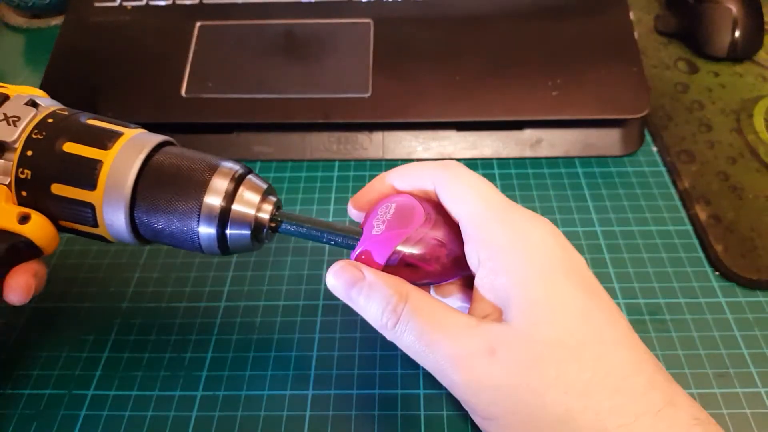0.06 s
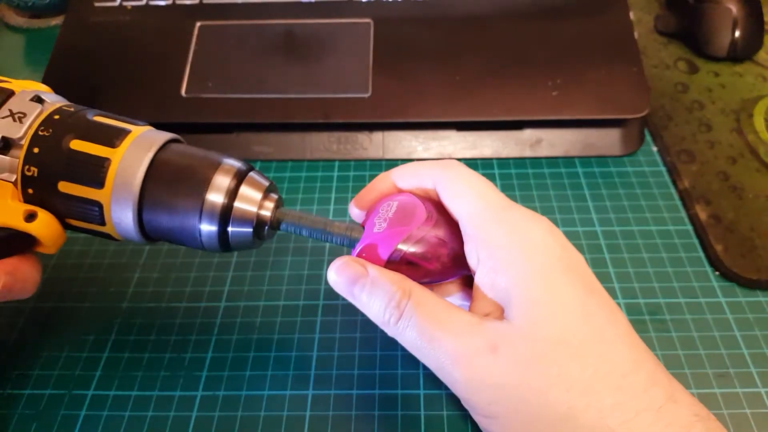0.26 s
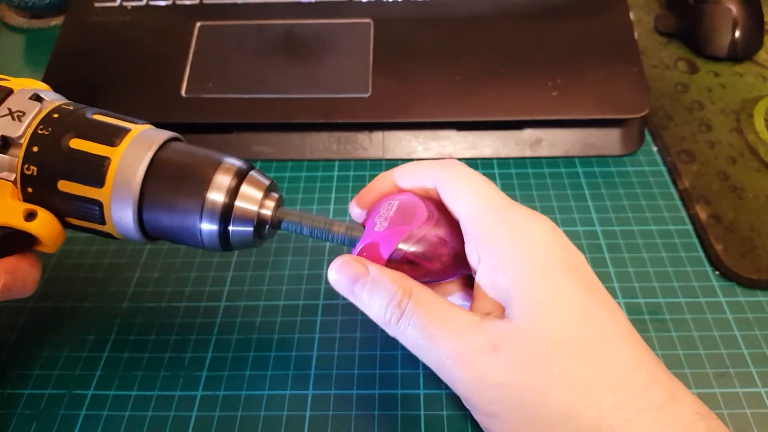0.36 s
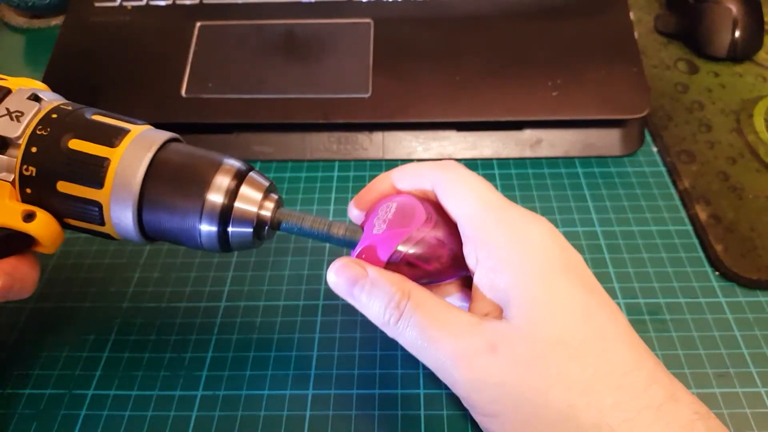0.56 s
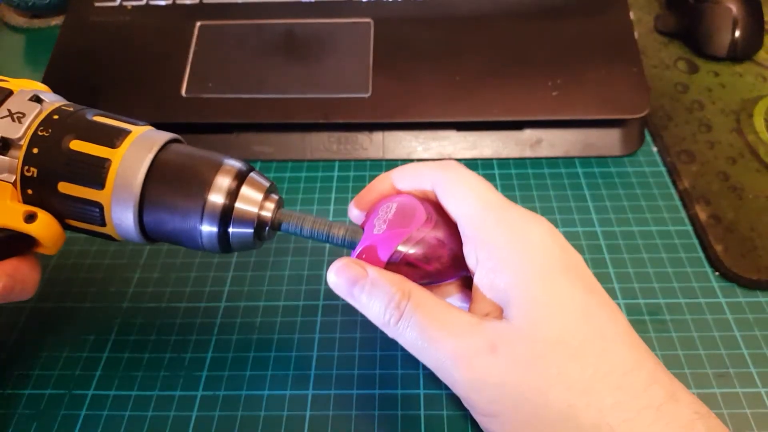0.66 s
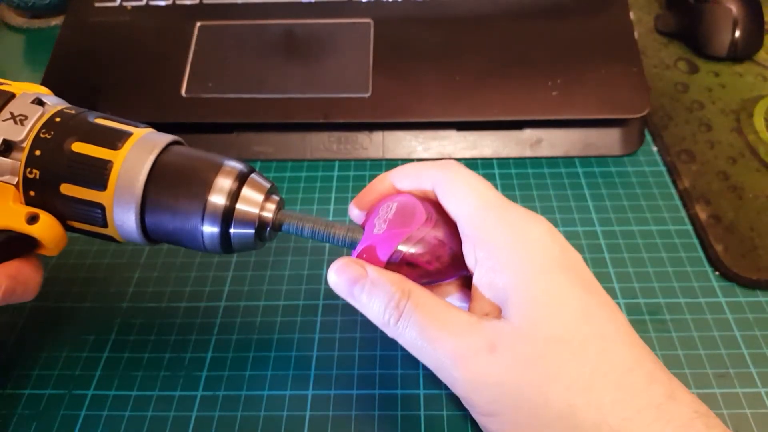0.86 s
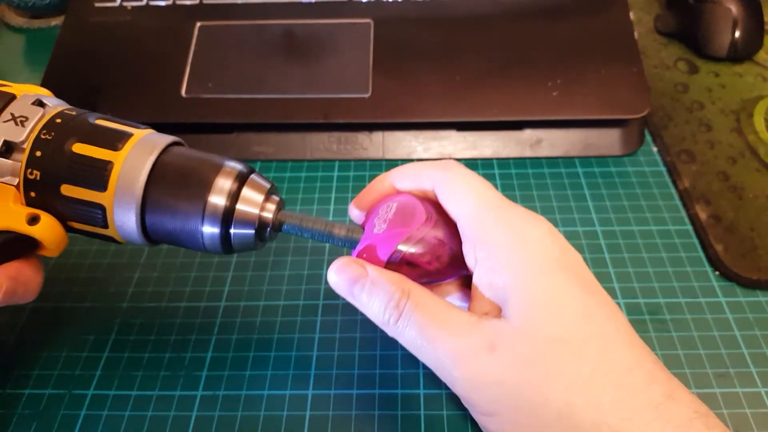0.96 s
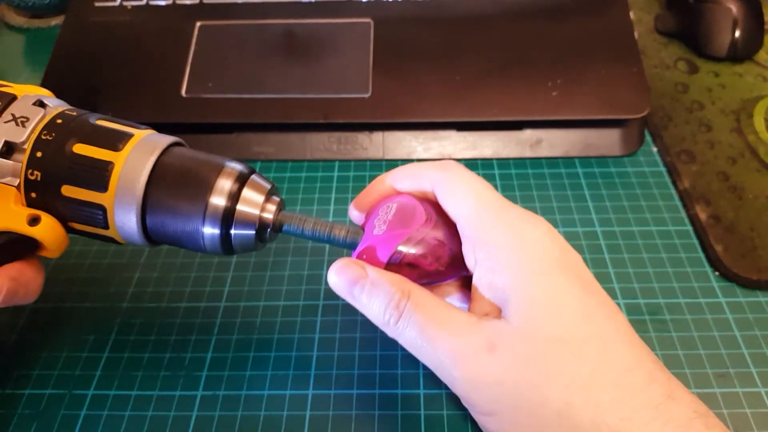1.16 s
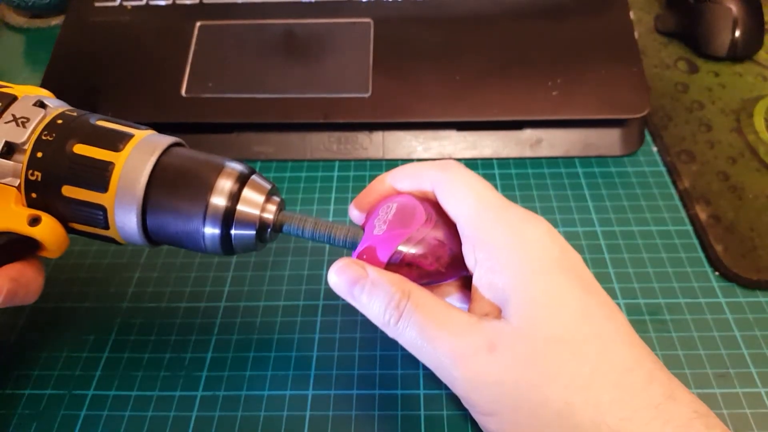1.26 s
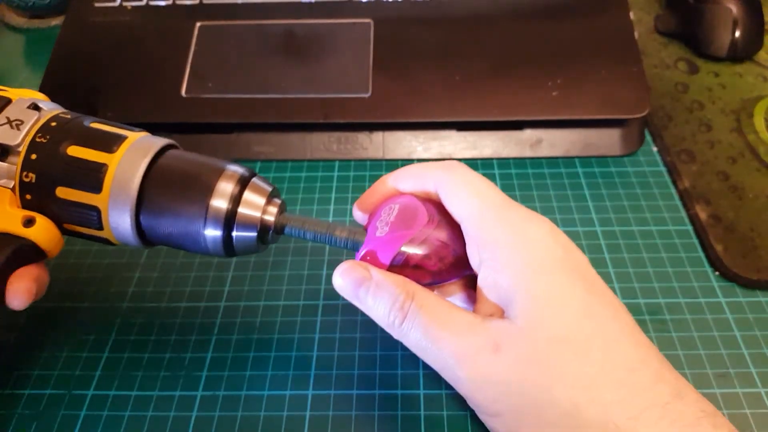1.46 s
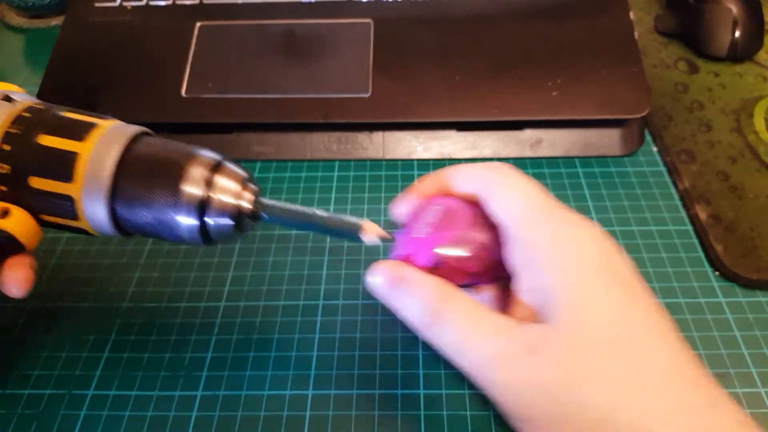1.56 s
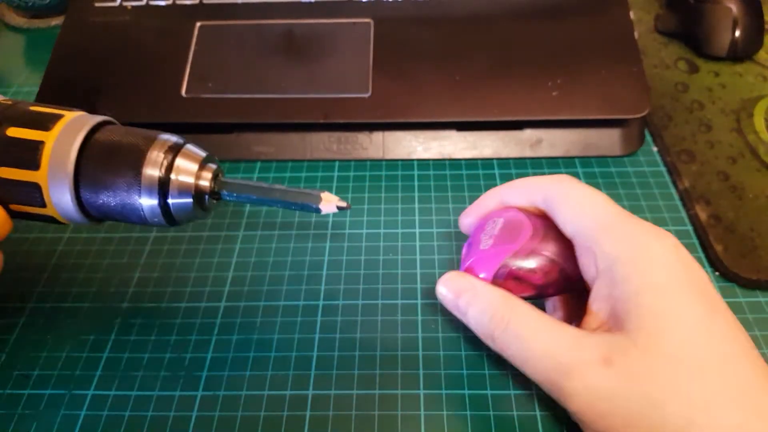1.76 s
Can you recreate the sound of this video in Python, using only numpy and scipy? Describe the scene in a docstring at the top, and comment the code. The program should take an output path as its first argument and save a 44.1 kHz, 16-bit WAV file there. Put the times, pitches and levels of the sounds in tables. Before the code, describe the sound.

Close up at a desk in a quiet room, a cordless drill starts with small clicks and runs once, gears whining and rattling as a sharpener rasps a spinning pencil. The brake clacks, followed by faint handling bumps.

```python
"""A small room, a stereo microphone close to a desk: a cordless drill spins a pencil in a hand-held
plastic sharpener. Over faint room tone the trigger clicks, the gear slack rattles and the motor runs
up to 392 turns a second. While it holds that speed, motor and planet gears whine and rattle, the blade
hisses on the wood and the pencil scuffs once a turn. At about a second and a half the brake stops it
with a clack, and the hands let go of the torque with a few dull thuds."""
import sys
import numpy as np
from scipy import signal
from scipy.fft import rfft, irfft
from scipy.io import wavfile
from scipy.ndimage import uniform_filter1d

SR = 44100
rng = np.random.default_rng(int(sys.argv[2]) if len(sys.argv) > 2 else 0)


def unload_wav(signal):
    """Save mono or channel-first audio to the path in sys.argv[1] as 16-bit WAV at rate SR, clipped to [-1, 1]."""
    wavfile.write(
        sys.argv[1],
        SR,
        np.round(np.clip(np.atleast_2d(signal).T, -1, 1) * 32767).astype(np.int16),
    )


N = 79380
T = np.arange(N) / SR
HZ = np.fft.rfftfreq(N, 1 / SR)
MOTOR_HZ, START_S, BRAKE_S = 392.5, .225, 1.4577
CARRIER_RATIO, CHUCK_RATIO = 4.045, 12.135  # motor turns to one turn of the planet carrier, of the chuck


def amp(db):
    """Decibels to gain."""
    return 10 ** (np.asarray(db) / 20)


def unit(x):
    """Scales to rms 1."""
    return x / np.sqrt(np.mean(x ** 2) + 1e-20)


def read(points, hz, column=1):
    """Reads a column of a table on a log-frequency axis."""
    table = np.transpose(sorted(map(tuple, points)))
    return np.interp(np.log(hz + 1), np.log(table[0] + 1), table[column])


def drift(rate_hz):
    """A smooth random wander of rms 1, up to about the given rate."""
    return unit(irfft(rfft(rng.standard_normal(N)) / (1 + (HZ / rate_hz) ** 4), N))


def blow(start, rise, decay):
    """The envelope of an impact: a straight rise and an exponential decay."""
    age = np.maximum(T - start, 0)
    return np.minimum(age / rise, 1) * np.exp(-np.maximum(age - rise, 0) / decay)


# How alike the microphone's two sides are. Each row: frequency in Hz, correlation from 0 to 1.
STEREO_LIKENESS = [(100, 1), (400, 1), (800, 0.38), (1400, 0), (4000, 0), (16000, 0)]

def colour(pair, spectrum):
    """Gives two white signals a smooth spectrum (one level column, or left and right) and shared bass."""
    left, other = rfft(pair)
    same = read(STEREO_LIKENESS, HZ)
    right = same * left + np.sqrt(1 - same ** 2) * other
    gain = amp([read(spectrum, HZ), read(spectrum, HZ, column=-1)])
    gain = uniform_filter1d(uniform_filter1d(gain, size=61), size=61)
    return irfft(gain * np.array([left, right]), N) * np.sqrt(SR / 2)


# The quiet room at the microphone. Each row: frequency in Hz, level in dB per Hz.
ROOM_TONE = [(20, -89), (60, -90.5), (125, -87), (200, -96.5), (350, -92.5), (600, -103), (1300, -103),
             (2500, -110), (7000, -112), (10000, -117), (12700, -112), (16000, -118)]

def room_tone():
    """A faint, steady noise, strongest in the bass."""
    return colour(rng.standard_normal((2, N)), ROOM_TONE)


# The small room's decay. Each row: frequency in Hz, seconds to fall by 60 dB.
ROOM_DECAY = [(150, 0.9), (1000, 0.21), (3000, 0.33), (7000, .42), (12000, .5)]

def reflections(x, tail_db=-23, early_db=-13.5, early_s=0.015):
    """Quick reflections from the desk and a faint tail from the room."""
    length = SR // 2
    hz, t, bands = signal.stft(rng.standard_normal((2, length)), SR, nperseg=256)
    decay = amp(-60 * t / read(ROOM_DECAY, hz)[:, None])
    tail = signal.istft(bands * decay, SR, nperseg=256)[1][:, :length]
    early = rng.standard_normal((2, length)) * np.exp(-T[:length] / early_s)
    echo = amp(tail_db) * tail / np.linalg.norm(tail[0])
    echo += amp(early_db) * early / np.linalg.norm(early[0])
    return signal.fftconvolve(x, echo, axes=1)[:, :N]


# Hands on the tool, close by. Each row: start in seconds, level in dB, pitch in Hz, decay in seconds.
HAND_BUMPS = [(.115, -56, 120, 0.043), (.19, -43, 125, 0.024), (.225, -45, 118, 0.014),
              (1.497, -38.5, 135, 0.034), (1.555, -44, 111.5, 0.018), (1.605, -51.5, 134.5, 0.056),
              (1.65, -52.5, 120, 0.023), (1.706, -49.5, 103.6, 0.014)]

def hand_bumps(rise_s=0.01):
    """Dull thuds as the hands take up the torque and let go of it."""
    rustle = amp(-19.5) * drift(420)
    return sum(amp(db) * blow(start, rise_s, decay) * (np.sin(2 * np.pi * hz * (T - start)) + rustle)
               for start, db, hz, decay in HAND_BUMPS)


# Tool and hand shaking. Each entry: level in dB, at 1, 2, 3 and 4 times the chuck speed.
CHUCK_SHAKE = [-66.5, -61.5, -54, -56.5]

def chuck_shake(speed, pencil, waver_db=3):
    """The off-centre chuck shakes the tool and the hand: a low, wavering drone."""
    drone = 0
    for order, db in enumerate(CHUCK_SHAKE, 1):
        waver = amp(waver_db * drift(17))
        drone += amp(db) * unit(waver * np.sin(2 * np.pi * (order * pencil + rng.random())))
    return drone * speed ** 2


# The pencil's scuff, before panning. Each row: frequency in Hz, level in dB per Hz.
SCUFF_SPECTRUM = [(30, -92), (130, -74.5), (200, -95), (290, -72), (400, -75), (500, -74.5), (600, -68.5),
                  (720, -87.5), (1200, -79.5), (2500, -100)]

def pencil_scuffs(speed, pencil, decay_turns=0.23):
    """The off-centre pencil scuffs the sharpener once a turn, a little right of the microphone."""
    scuffs = np.exp(-((pencil + .5) % 1) / decay_turns) * rng.standard_normal((2, N))
    return colour(unit(scuffs) * speed, SCUFF_SPECTRUM) * amp([[-2], [2]])


# Trigger, gear slack and brake. Each row: start in seconds, relative level in dB, rise and decay
# in seconds.
TOOL_CLICKS = [(0.135, -30, 0.024, 0.046), (0.17, -15.5, .003, 0.011), (.19, -28, .006, 0.041),
               (0.208, -18, 0.0057, 0.013), (0.219, -14.5, 0.0035, .012), (0.239, -6.5, 0.0051, 0.006),
               (1.531, 0, 0.0076, .012), (1.56, -27, 0.0068, .022)]
# A 0 dB click at close range. Each row: frequency in Hz, level in dB per Hz.
CLICK_SPECTRUM = [(100, -75), (300, -71), (700, -74.5), (1100, -62.5), (1700, -62.5), (3000, -66.5),
                  (4300, -65.5), (5500, -69), (7300, -67), (9000, -78.5), (11000, -78), (12800, -66),
                  (16000, -70.5)]

def tool_clicks():
    """The trigger and the gear slack rattle the tool as it starts; the brake clacks as it stops."""
    level = sum(amp(db) * blow(start, rise, decay) for start, db, rise, decay in TOOL_CLICKS)
    return colour(level * rng.standard_normal((2, N)), CLICK_SPECTRUM)


# Blade and sharpener shell up close, mid-run. Each row: frequency in Hz, left and right in dB per Hz.
BLADE_RASP = [(60, -96.5, -76.5), (267, -82, -85.5), (540, -72, -75.5), (650, -74, -74.5),
              (960, -71, -68.5), (1420, -63.5, -66.5), (1830, -65, -62), (2100, -72.5, -74.5),
              (2436, -60, -59.5), (2600, -66, -71.5), (2960, -62.5, -61.5), (3380, -65, -69.5),
              (4220, -60.5, -66.5), (4520, -70, -58), (4820, -67, -77.5), (4870, -65, -76.5),
              (7500, -58.5, -66.5), (8530, -69.5, -66.5), (11500, -64, -67.5), (13700, -66.5, -71),
              (15500, -67.5, -81)]

def blade(speed, pencil, grain_db=-0.25, swell=0.1, fade_db_per_s=-2):
    """Wood fibres tear at the blade in dense grains, swelling once a turn, easing as the point forms."""
    grains = unit(amp(grain_db * drift(700)) * (1 + swell * np.cos(2 * np.pi * pencil)))
    level = speed ** 0.46 * amp(fade_db_per_s * (T - (START_S + BRAKE_S) / 2))
    return colour(rng.standard_normal((2, N)) * grains * level, BLADE_RASP)


def tone(cycles, levels_db, flutter):
    """A fluttering partial, with its own phase for each level given."""
    return np.array([np.sqrt(2) * amp(db) * (1 + flutter * drift(40))
                     * np.sin(2 * np.pi * (cycles + rng.random())) for db in levels_db])


def tooth_wear(carrier, count=8):
    """Uneven teeth: a random pattern of the lowest few multiples, the same in every carrier turn."""
    cycle = np.linspace(0, 1, count * 20)
    pattern = sum(np.exp(2j * np.pi * (k * cycle + rng.random())) / (abs(k) + 2) ** .5
                  for k in range(-count, count + 1) if k)
    return np.interp(carrier % 1, cycle, pattern)


def mesh(cycles, carrier, levels_db, looseness):
    """Gear teeth meet: uneven ones add sidebands at the carrier rate, loose ones smear the tone."""
    spin = np.exp(2j * np.pi * cycles)
    sides = []
    for db in levels_db:
        uneven = unit((spin * tooth_wear(carrier)).real)
        smear = unit(drift(450) * spin.imag)
        whistle = tone(cycles, [0], flutter=.3)[0]
        sides.append(amp(db) * (whistle + looseness * (.7 * uneven + .35 * smear)))
    return np.array(sides)


# The gear whistle, then its octave, up close at full speed. Each row: left and right level in dB.
MESH_LEVELS = [(-30.5, -41), (-23.3, -47)]
# The gearbox housing at full speed. Each row: frequency in Hz, left and right in dB per Hz.
HOUSING_SPECTRUM = [(1070, -81.5, -87.5), (1660, -64, -72), (2270, -73, -83.5), (3390, -71.5, -59.5),
                    (3850, -61.5, -65), (4800, -72, -75), (6020, -63.5, -54), (6400, -59, -72.5),
                    (7180, -58.5, -60), (8180, -82, -72), (11140, -68, -68), (12160, -52, -74),
                    (12060, -51.5, -60), (13270, -57.5, -64.5), (14200, -68, -64), (16000, -70, -69)]

def gears(speed, turns, teeth=65, backlash_turns=0.00094, repeat_share=.14, throb_depth=.6):
    """Planet gears mesh and rattle in the housing; part of the rattle repeats with each carrier turn."""
    carrier = turns / CARRIER_RATIO + backlash_turns * drift(17)
    turn_samples = int(SR * CARRIER_RATIO / MOTOR_HZ)
    patterns = irfft(np.exp(2j * np.pi * rng.random((2, turn_samples // 2))), turn_samples * 8)
    cycle = np.linspace(0, 1, turn_samples * 8)
    repeating = unit(np.array([np.interp(carrier % 1, cycle, side) for side in patterns]))
    rattle = np.sqrt(repeat_share) * repeating + np.sqrt(1 - repeat_share) * rng.standard_normal((2, N))
    beats = np.cos(2 * np.pi * carrier) + np.cos(2 * np.pi * carrier * 3) / 2 + np.cos(2 * np.pi * turns)
    throb = unit(np.exp(throb_depth * beats / 2))
    acceleration = np.gradient(speed, T)
    load = 1 + np.maximum(.19 * acceleration, -.07 * acceleration)  # run-up and braking load the teeth
    whistle = mesh(teeth * carrier, carrier, MESH_LEVELS[0], speed ** 3) * speed ** 1.44 * load
    octave = mesh(2 * teeth * carrier, carrier, MESH_LEVELS[1], speed ** 3) * speed ** 7
    return colour(rattle * throb * speed ** 0.87, HOUSING_SPECTRUM) + whistle + octave


def motor_speed(run_up_s=.045, braking_s=0.091, wander=0.0011):
    """Share of full speed: a quick run-up, a hold, then the brake."""
    up = 1 - np.exp(-(np.maximum(T - START_S, 0) / run_up_s) ** 1.3)
    down = 1 - np.clip((T - BRAKE_S) / braking_s, 0, 1) ** 2.1
    return up * down * (1 + wander * drift(12.5))


# The motor's whine. Each entry: one tone, as a multiple of the shaft speed.
WHINE_ORDERS = [2, 3, 4, 8, 21]
# Those tones up close at full speed. Each row: left and right level in dB.
WHINE_LEVELS = [(-53, -58), (-53, -52), (-46, -51), (-37, -24.3), (-50, -45)]

def motor(speed, turns, pencil, hum_db=(-44.5, -40.5), pulse_turns=0.12, release_s=.03):
    """The shaft hums, pulsing once a pencil turn; its higher tones come in only near full speed."""
    angle = pencil % 1 - .5
    swell = 0.76 * np.exp(-(angle / pulse_turns) ** 2 / 2)
    pulse = swell * np.sin(2 * np.pi * (turns + 1.6 * angle))  # pitched a little above the hum
    hum_level = speed * np.tanh((speed / 0.5) ** 4)  # sets in around half speed
    hum = np.sqrt(2) * amp(hum_db)[:, None] * (np.sin(2 * np.pi * turns) + pulse) * hum_level
    whine = sum(tone(order * turns, db, flutter=0.072) for order, db in zip(WHINE_ORDERS, WHINE_LEVELS))
    driven = np.exp(-np.maximum(T - BRAKE_S, 0) / release_s)
    near_full_speed = (1 + np.tanh((speed - 0.931) / 0.028)) / 2
    return hum + whine * driven * near_full_speed


def scene():
    """At the desk, one shaft speed drives the motor, the gears and the pencil."""
    speed = motor_speed()
    turns = np.cumsum(speed) * MOTOR_HZ / SR
    pencil = turns / CHUCK_RATIO  # turns of the pencil
    drill = motor(speed, turns, pencil) + gears(speed, turns) + chuck_shake(speed, pencil) + tool_clicks()
    direct = drill + blade(speed, pencil) + pencil_scuffs(speed, pencil) + hand_bumps()
    return direct + reflections(direct) + room_tone()


def record(dry):
    """After the microphone, a noise gate turns very quiet treble down and a low-pass trims the top."""
    gate_hz, threshold_db, deepest_cut_db, edge_hz = 615, -62, 7, 15740
    treble = irfft(rfft(dry) * (1 - 1 / (1 + (HZ / gate_hz) ** 4)), N)
    level_db = 10 * np.log10(abs(uniform_filter1d((treble ** 2).mean(0), size=900)) + 1e-14)
    cut_db = np.clip(1.2 * (threshold_db - level_db), 0, deepest_cut_db)
    gated = dry + treble * (amp(-cut_db) - 1)
    low_pass = signal.firwin(1023, edge_hz, window=("kaiser", 8), fs=SR)
    return signal.oaconvolve(gated, low_pass[None], "same", axes=1)


dry = scene()
out = record(dry)
unload_wav(out)
```